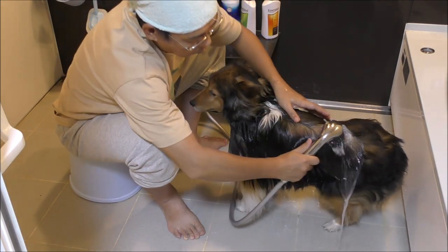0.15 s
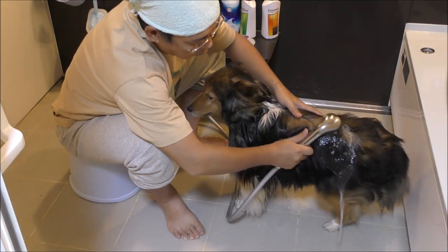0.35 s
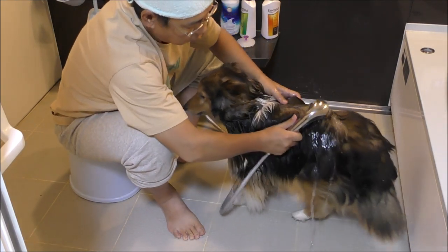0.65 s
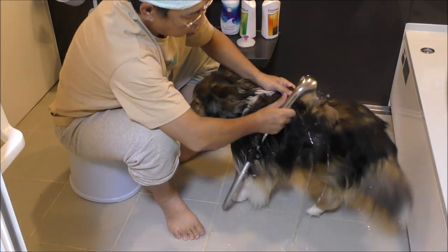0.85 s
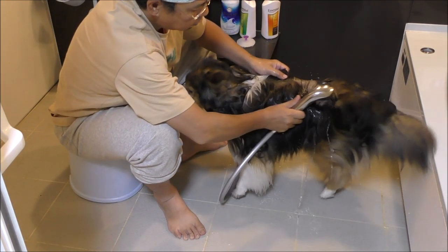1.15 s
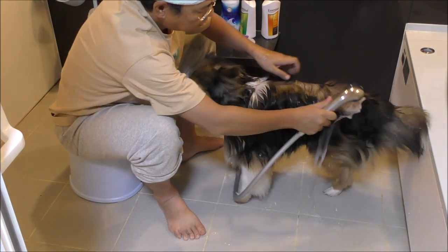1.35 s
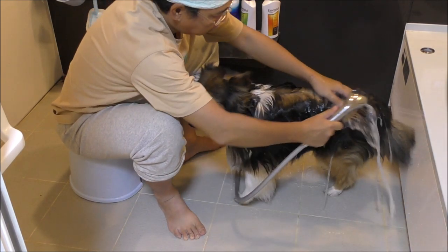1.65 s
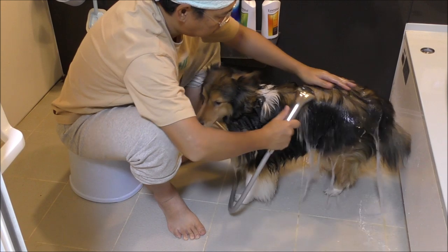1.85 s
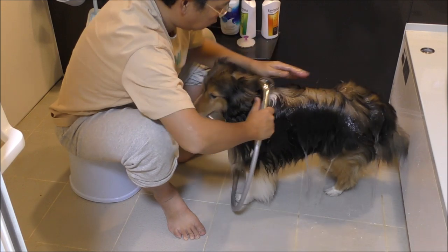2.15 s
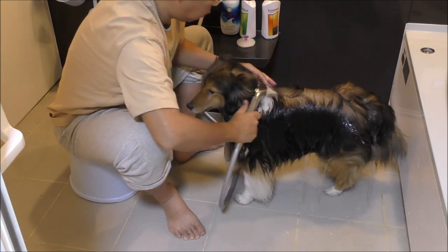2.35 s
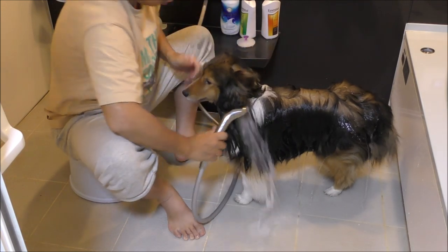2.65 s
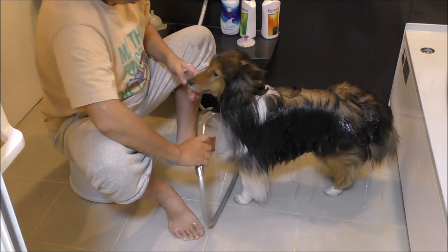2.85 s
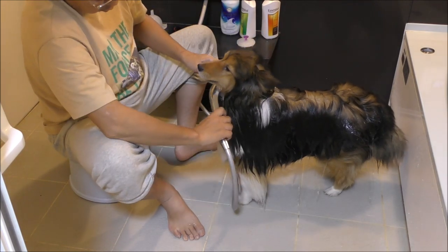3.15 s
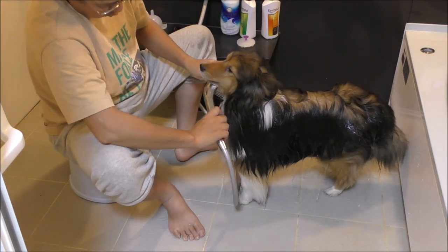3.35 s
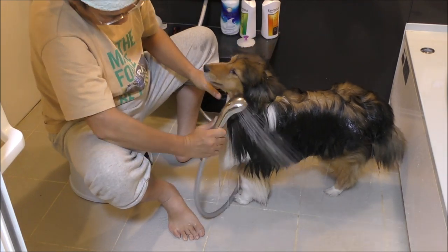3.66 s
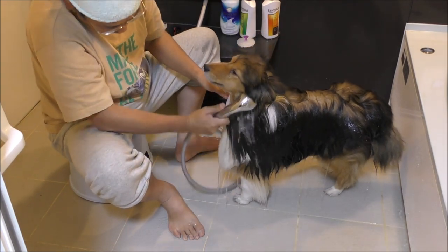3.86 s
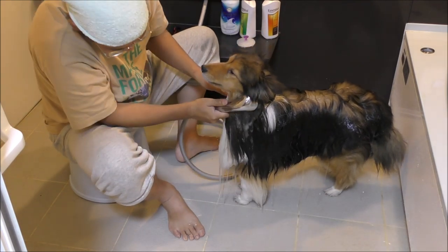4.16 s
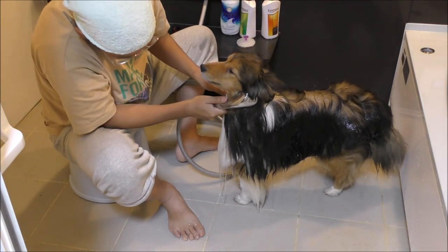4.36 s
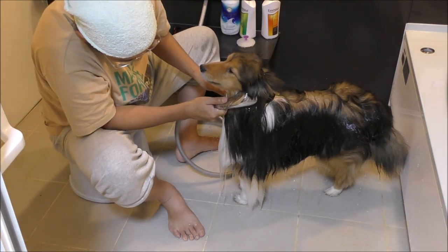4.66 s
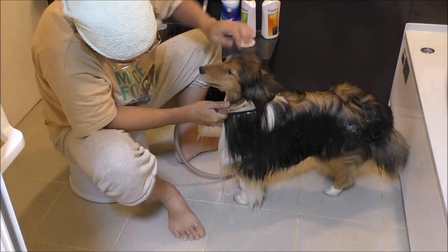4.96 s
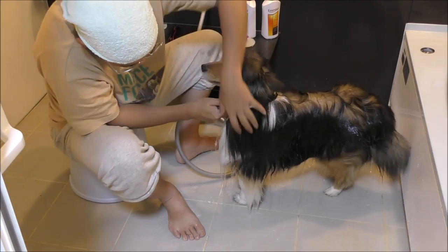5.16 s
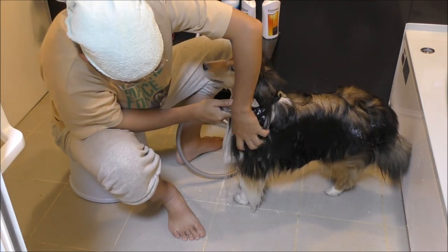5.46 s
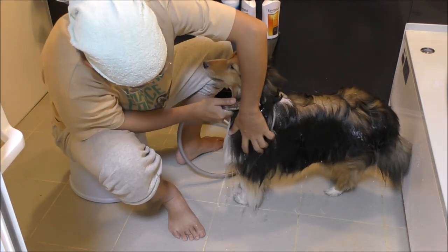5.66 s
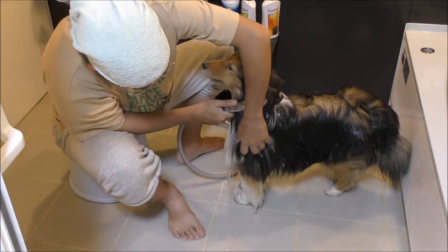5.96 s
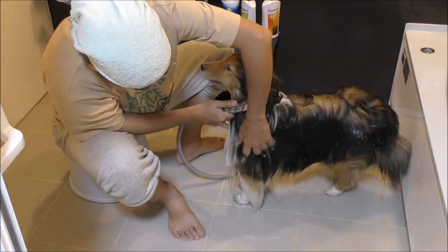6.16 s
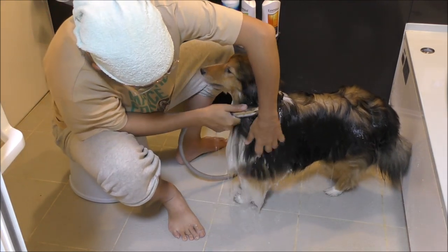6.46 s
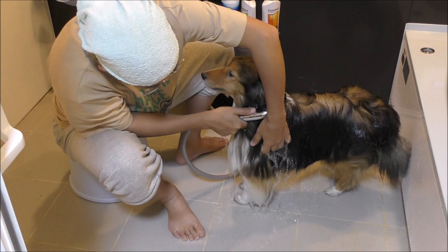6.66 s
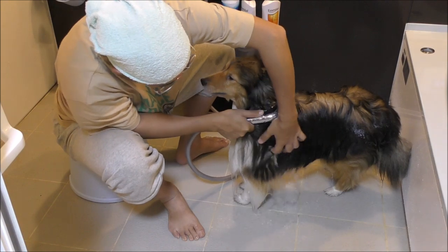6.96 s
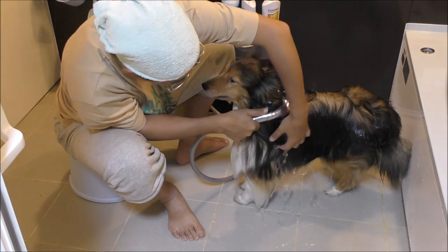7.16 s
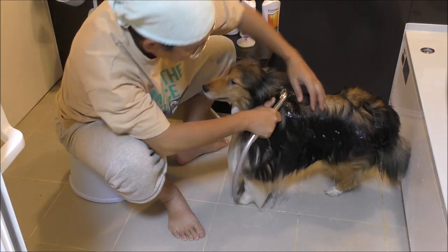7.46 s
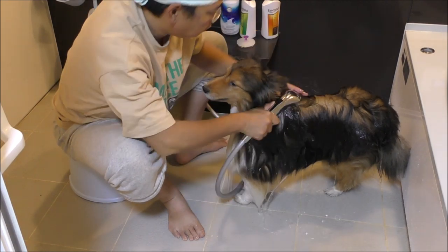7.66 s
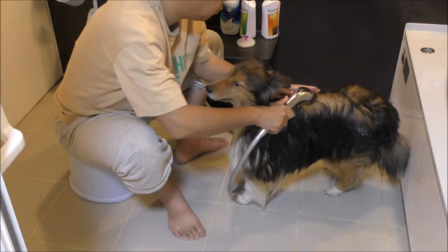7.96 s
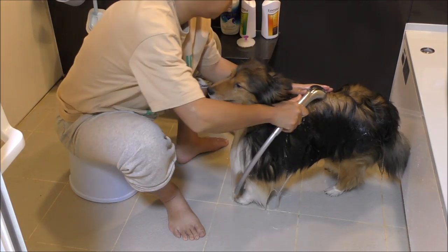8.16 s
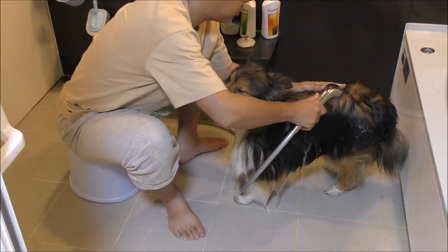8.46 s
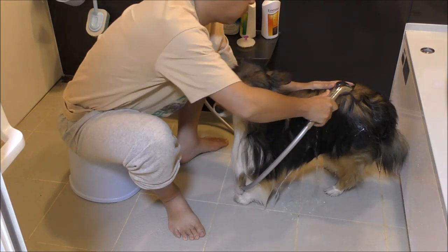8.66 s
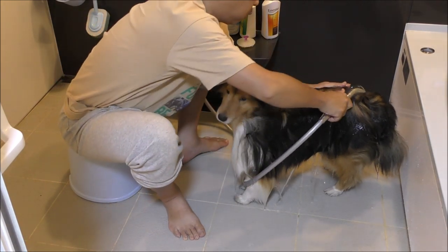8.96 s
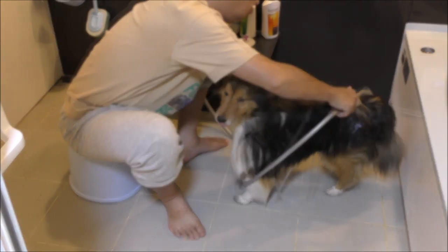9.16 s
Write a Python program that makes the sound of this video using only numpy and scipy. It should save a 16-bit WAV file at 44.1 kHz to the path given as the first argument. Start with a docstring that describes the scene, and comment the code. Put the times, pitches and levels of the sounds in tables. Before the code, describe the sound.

A hand shower sprays soaked fur with uneven sizzling, is pressed in quietly with spitting leaks, and briefly bursts back before fading to splutters.

```python
"""Hand-shower jets rinse a dog in a small tiled bathroom, hissing through the air and churning in its wet coat.
After four seconds the head is pressed into the fur, fizzing and letting out squirts; it is briefly lifted again.
Hiss, sizzle, drips and run-off are coloured showers of random impacts; churning is a bank of ringing bubbles;
squirts are decaying, pitched bursts of droplets. Run-off patters on the tiles, over a low, droning room noise.
"""
import sys
import numpy as np
from scipy import signal
from scipy.fft import rfft, irfft
from scipy.io import wavfile

SR = 44100
rng = np.random.default_rng(int(sys.argv[2]) if len(sys.argv) > 2 else 0)


def generate_wav(sig):
    """Save sig (samples, or channels by samples) to the path in sys.argv[1] as 16-bit PCM at SR."""
    pcm = np.round(np.clip(np.atleast_2d(sig).T, -1, 1) * 32767).astype(np.int16)
    wavfile.write(sys.argv[1], SR, pcm)


N = 411003
T = np.arange(N) / SR   # time of every sample (s)

# Source levels below are set ahead of the room's reflections and balance.
# how freely the jets play on the coat: start_s, level_db
JET_PLAY = [(0.0, -28), (0.21, -30.5), (0.28, -43.5), (0.36, -48), (0.46, -33.5), (0.9, -29.5),
            (1.42, -28.5), (2.1, -30.5), (2.6, -33.5), (3.0, -33.5), (3.98, -32.5), (4.03, -42),
            (4.25, -57.5), (6.65, -54.5), (7.2, -44.5), (7.35, -30.5), (7.5, -37.5), (7.61, -46.5),
            (8.4, -52), (9.05, -48.5), (9.32, -41)]
# water standing in the coat under the jets: start_s, churn level_db at reference play, bubble pitch_hz
COAT_POOL = [(0.0, -25, 2780), (0.5, -30, 2900), (0.78, -27, 2670), (1.03, -32, 2250), (1.39, -26, 2510),
             (1.7, -25, 1650), (1.97, -31.5, 2400), (2.07, -25.5, 2680), (2.2, -30.5, 2120),
             (2.38, -25, 2540), (2.78, -30.5, 2720), (2.95, -34, 2260), (3.12, -27.5, 3200),
             (3.47, -26, 2110), (3.65, -34, 2520), (4.3, -25, 1600), (6.6, -24.5, 1620), (7.3, -33.5, 3340),
             (7.45, -26.5, 2550), (9.32, -36.5, 1490)]
# jets swing square onto the ribs: centre_s, half_length_s, drumming level_db, spray level_db
RIB_SWEEPS = [(0.88, 0.092, -49, -31.5), (1.078, 0.053, -46.5, -23), (2.054, 0.03, -54, -26),
              (2.805, 0.042, -47.5, -21), (3.726, 0.038, -39, -25.5), (3.973, 0.029, -64, -27)]
# louder escapes of water under the rim of the head:
# start_s, level_db before the pressure front, pitch_hz, spread_octaves, fade_s
RIM_SQUIRTS = [(4.226, -34.5, 5200, 0.26, 0.024), (4.342, -36.5, 4300, 0.35, 0.042),
               (4.508, -41, 11800, 0.3, 0.024), (4.574, -41, 7600, 0.14, 0.033),
               (4.671, -34.5, 5360, 0.34, 0.058), (4.8, -40, 4060, 0.12, 0.036),
               (4.815, -43.5, 9500, 0.12, 0.11), (5.139, -37, 6640, 0.11, 0.016),
               (5.225, -43, 11670, 0.24, 0.027), (5.27, -42.5, 2230, 0.11, 0.065),
               (5.65, -43, 2620, 0.048, 0.034), (5.34, -37, 8520, 0.38, 0.044),
               (5.386, -37.0, 6400, 0.14, 0.044), (5.667, -42.5, 6800, 0.28, 0.3),
               (5.784, -38, 4280, 0.09, 0.031), (5.9, -40, 4410, 0.15, 0.037),
               (5.965, -42.5, 2460, 0.08, 0.032), (6.016, -43.5, 3480, 0.068, 0.034),
               (6.066, -29, 2740, 0.41, 0.036), (6.118, -36, 7500, 0.44, 0.029),
               (6.274, -42, 3620, 0.14, 0.066), (6.43, -39, 5600, 0.64, 0.08),
               (6.673, -38.5, 1930, 0.35, 0.027), (6.71, -35.5, 6500, 0.6, 0.069),
               (6.867, -33, 6100, 0.61, 0.2), (7.487, -22.5, 3880, 0.44, 0.033),
               (7.675, -25, 4270, 0.79, 0.14), (7.68, -24.5, 1710, 0.24, 0.02),
               (7.854, -30.5, 3630, 0.39, 0.11), (7.928, -37.5, 2000, 0.26, 0.034),
               (8.06, -33, 4050, 0.56, 0.045), (8.21, -35.0, 9300, 0.3, 0.026),
               (8.253, -29.5, 3640, 0.5, 0.027), (8.429, -39, 2800, 0.31, 0.057),
               (8.503, -33, 6260, 0.19, 0.023), (8.537, -31.5, 5470, 0.6, 0.073),
               (8.643, -35, 8850, 0.32, 0.036), (8.718, -43, 2400, 0.07, 0.033),
               (8.724, -38.5, 6850, 0.24, 0.069), (8.852, -38, 7010, 0.12, 0.026),
               (8.975, -32, 9500, 0.54, 0.021), (9.082, -30.5, 10400, 0.5, 0.24),
               (9.231, -31, 5400, 0.13, 0.032)]
# run-off pouring from the coat onto the tiles: centre_s, level_db, half_length_s
RUNOFF_POURS = [(.06, -43, 0.07), (.52, -45.5, 0.035), (.75, -50, 0.065), (1.9, -43, 0.08),
                (2.98, -41, 0.069), (3.72, -44, 0.071), (6.95, -49, 0.04), (7.42, -44.5, 0.13)]

# colour of the mist hissing through the air: frequency_hz, density_db_per_hz
MIST_COLOUR = [(1000, -10), (2500, -29), (5000, -10.5), (8000, -3.5), (9500, -1), (12500, -2.5),
               (15000, -5), (16000, -11.5)]
# colour of drops sizzling on fur: frequency_hz, density_db_per_hz
SIZZLE_COLOUR = [(850, -10), (1200, -1.5), (2000, -11), (3000, -2), (4500, 0.5), (6500, -1), (8200, -7),
                 (10000, -4), (15000, -16.5)]
# colour of spray thrown off the ribs: frequency_hz, density_db_per_hz
SPLASH_COLOUR = [(1900, -7), (3200, 1), (6000, -1.5), (10000, -0.5), (15000, -6)]
# colour of the jets drumming on the body: frequency_hz, density_db_per_hz
BODY_COLOUR = [(50, -20), (100, -17), (165, -6), (300, -5.5), (450, -13), (800, -38)]
# colour of run-off on the tiles: frequency_hz, density_db_per_hz
TILE_COLOUR = [(150, -13.5), (300, -6.5), (550, -7.5), (720, 1.5), (900, -12), (1100, 4), (1500, -13.5)]
# colour of the room's low rush: frequency_hz, density_db_per_hz
ROOM_COLOUR = [(15, -49), (25, -9), (43, -11.5), (60, -8), (114, -8.5), (200, -2), (225, -4.5), (289, -0.5),
               (395, -1.5), (425, -5.5), (507, -2), (554, -8.5), (850, -13), (1100, -45), (1870, -120)]
# low droning resonances of the room: pitch_hz, width_hz, level_db
ROOM_DRONES = [(117.2, 11, -64.5), (159.2, 4, -67), (291.7, 6.5, -64)]
# stereo width of reflections and room noise: frequency_hz, side_gain_db
STEREO_WIDTH = [(60, -2.5), (150, -3.5), (400, -9), (2500, -10), (4500, -7.5), (8000, -28.5), (16000, -78)]

REFERENCE_JETS_DB = -30   # the jets playing openly, a hand's width from the coat
MIST_DB, SIZZLE_DB = -30, -30.5   # levels at reference play
# dB of change for each dB of the jets; pressing the head in muffles the drops on fur least
MIST_FOLLOWS, SIZZLE_FOLLOWS, CHURN_FOLLOWS = 0.89, 0.68, 0.96
PRESSED_FROM_S = 4.2   # the head is pushed into the fur; small leaks run from here to the end
SPLUTTER_DB, SPLUTTER_RANGE_DB = -43, 1.5   # weakest broad spurt, and how much louder one can be
DRIP_DB = -56.5   # the wet coat drips whatever the jets do
ROOM_RUSH_DB = -55
ROOM_T60_S = 0.32   # reverberation time over nearly the whole range
LEAN_DB = -23.5   # side against mid: the dog stands a little to the right
CUTOFF_HZ = 15850


def water_levels():
    """Mist, sizzle and churn levels (dB) follow the play of the jets; bubble pitch (Hz) follows the pool."""
    play_db = in_time(JET_PLAY)[0] - REFERENCE_JETS_DB
    pool_db, churn_hz = in_time(COAT_POOL)
    mist_db = MIST_DB + MIST_FOLLOWS * play_db
    sizzle_db = SIZZLE_DB + SIZZLE_FOLLOWS * play_db
    churn_db = pool_db + CHURN_FOLLOWS * play_db
    return mist_db, sizzle_db, churn_db, churn_hz


def wobble(per_s, depth_db):
    """The hand and the dog never keep quite still: a random wander in dB."""
    return depth_db * drift(per_s)


def spray(level_db, spectrum, per_s, spread_db, flutter_db):
    """A shower of tiny impacts whose strength flutters at a slow and a fast pace, then takes on a colour."""
    flutter = flutter_db * (drift(per_s=35) + drift(per_s=300))
    shower = drops(per_s, spread_db) * from_db(flutter)
    return from_db(level_db) * rms_one(coloured(shower, spectrum))


def churn(level_db, pitch_hz, spread_oct, per_s, size_db, sharpness, patchy_db, count=18):
    """Jets beat air into soaked fur; bubbles ring around a pitch that follows the depth of the water."""
    out, power = 0, 0
    for hz in np.geomspace(1120, 4400, count):
        octaves_off = np.log2(hz / pitch_hz)
        share = np.exp(-(octaves_off / spread_oct) ** 2 / 2)
        bubbles = resonance(drops(per_s, size_db), hz, hz / sharpness)
        patches = from_db(patchy_db * drift(per_s=25))
        out = out + np.sqrt(share) * patches * bubbles
        power = power + share
    low_cut = signal.butter(4, 1000, "high", fs=SR, output="sos")
    return from_db(level_db) * signal.sosfilt(low_cut, out / np.sqrt(power))


def splashes():
    """Each swing onto the ribs throws up a bright surge of spray."""
    surges = swells([(s, db, half) for s, half, _, db in RIB_SWEEPS])
    return surges * rms_one(coloured(drops(per_s=8000, spread_db=2.5), SPLASH_COLOUR))


def drumming():
    """A dull rumble of impacts while the jets hit the ribs square on."""
    surges = swells([(s, db, half) for s, half, db, _ in RIB_SWEEPS])
    return surges * rms_one(coloured(drops(per_s=1500, spread_db=7.5), BODY_COLOUR))


def squirts(rows, slit_opening_s, front_db, front_s, per_s, size_db, ragged_db):
    """A gap opens under the rim: a sudden burst of droplets, coloured by the pocket of water behind it."""
    out = np.zeros(N)
    grains = drops(per_s, size_db) * from_db(ragged_db * drift(per_s=160))
    steps = np.linspace(-4, 4, 17)   # in spreads either side of the pitch
    bell_db = -np.abs(steps) ** 3   # flat-topped and steep-sided
    for s, db, hz, spread, fade in rows:
        start = int(s * SR)
        t = T[:min(int(7 * fade * SR), N - start)]
        span = slice(start, start + len(t))
        pocket = np.c_[hz * 2 ** (steps * spread), bell_db]
        attack_s = slit_opening_s * np.exp(-spread / 0.053)   # broader squirts open faster
        front = from_db(front_db * np.exp(-t / front_s))   # the pent-up pressure goes first
        shape = (1 - np.exp(-t / attack_s)) * np.exp(-t / fade) * front
        out[span] += from_db(db) * shape * rms_one(coloured(grains[span], pocket))
    return out


def splutter(pitch_hz, spread_oct, fade_s, count=30):
    """Rows of soft, broad spurts: pressure under the buried head lets go several times a second."""
    when, size, pitch, length = rng.random((count, 4)).T
    level_db = SPLUTTER_DB + SPLUTTER_RANGE_DB * size
    hz = pitch_hz * 2 ** (pitch - .5)
    return np.c_[pressed_times(when), level_db, hz, np.full(count, spread_oct), fade_s * (.5 + length)]


def seepage(level_db, range_db, low_hz, high_hz, spread_oct, fade_s, count=100):
    """Rows of tiny squirts at chance pitches with the head in the fur; higher ones tend to be broader."""
    when, size, pitch, width, length = rng.random((count, 5)).T
    row_db = level_db + range_db * size ** 2
    hz = low_hz * (high_hz / low_hz) ** pitch
    spread = spread_oct * (.5 + width) * (.5 + pitch)
    return np.c_[pressed_times(when), row_db, hz, spread, fade_s * (.5 + length)]


def pressed_times(chance):
    """Unevenly paced moments from when the head is pressed in until just before the end."""
    count = len(chance)
    length_s = T[-1] - PRESSED_FROM_S - .05
    return PRESSED_FROM_S + (np.arange(count) + chance) / count * length_s


def drips(level_db, per_s, size_db, sharpness, count=8):
    """Stray larger drops: sharp ticks from a bank of short resonances, each with its own pitch."""
    pitches_hz = np.geomspace(2200, 12500, count)
    ticks = sum(resonance(drops(per_s, size_db), hz, hz / sharpness) for hz in pitches_hz)
    return from_db(level_db) * rms_one(ticks)


def bathroom(x, direct_db, wet_db, count=5):
    """Mid and side: drops land at ever different places, each with reflections of its own."""
    places = np.array([drift(per_s=110) for _ in range(count)])
    places /= np.sqrt(np.sum(places ** 2, axis=0))   # constant total power

    def reflections():
        """Reflections of all the places, summed."""
        wet = sum(signal.oaconvolve(x * near, tail(top_t60_s=0.27, split_hz=20000))[:N]
                  for near in places)
        return from_db(wet_db) * wet

    mid, side = reflections(), reflections()
    return from_db(direct_db) * x + mid, side


def tail(top_t60_s, split_hz):
    """Dense reflections between tiles as decaying noise; unit energy."""
    length = SR * 3 // 4
    t, noise = T[:length], rng.standard_normal(length)
    main = signal.sosfilt(signal.butter(1, split_hz, fs=SR, output="sos"), noise)
    rest = noise - main
    response = main * from_db(-60 * t / ROOM_T60_S) + rest * from_db(-60 * t / top_t60_s)
    response = response * (t > .004)   # a short gap before the first reflection
    return response / np.sqrt(np.sum(response ** 2))


def near_echo(x, echo_db):
    """A small hard surface half a metre away throws the treble back."""
    lag = round(.00297 * SR)
    high_pass = signal.butter(2, 7000, "high", fs=SR, output="sos")
    return x + from_db(echo_db) * np.pad(signal.sosfilt(high_pass, x), (lag, 0))[:N]


def room_noise():
    """A steady low rush of coloured noise with a few droning resonances."""
    rush = from_db(ROOM_RUSH_DB) * rms_one(coloured(rng.standard_normal(N), ROOM_COLOUR))
    drones = sum(from_db(db) * resonance(rng.standard_normal(N), hz, width) for hz, width, db in ROOM_DRONES)
    return rush + drones


def drops(per_s, spread_db):
    """Impacts at random moments and of random sign, many small and a few large; unit power."""
    at = np.flatnonzero(rng.random(N) < per_s / SR)
    size = from_db(spread_db * np.minimum(rng.standard_normal(len(at)), 3))
    clicks = np.zeros(N)
    clicks[at] = size * rng.choice([-1, 1], len(at))
    return rms_one(clicks)


def resonance(x, hz, width_hz):
    """Two-pole resonance that keeps the power of white noise."""
    r = np.exp(-np.pi * width_hz / SR)
    feed = np.sqrt((1 - r * r) / 2) * np.array([1, 0, -1])
    ring = [1, -2 * r * np.cos(2 * np.pi * hz / SR), r * r]
    return signal.lfilter(feed, ring, x + 1e-18)


def coloured(x, spectrum, size=4096):
    """Causal (minimum-phase) filter with the given spectrum."""
    cepstrum = irfft(np.log(gain_at(spectrum, np.fft.rfftfreq(size, 1 / SR))))
    cepstrum[1:size // 2] *= 2   # fold the cepstrum into its causal half
    cepstrum[size // 2 + 1:] = 0
    return signal.oaconvolve(x, irfft(np.exp(rfft(cepstrum))))[:len(x)]


def gain_at(points, hz):
    """Gain of a spectrum, falling 20 dB per octave past its ends."""
    f, db = np.transpose(points)
    octave = np.log2(np.maximum(hz, 1))
    outside = np.abs(octave - np.clip(octave, np.log2(f[0]), np.log2(f[-1])))
    return from_db(np.interp(octave, np.log2(f), db) - 20 * outside)


def drift(per_s):
    """Random wander: straight lines between normal random values, per_s of them a second."""
    knots = rng.standard_normal(N // 100)
    return np.interp(T * per_s, np.arange(len(knots)), knots)


def swells(rows):
    """Gain of smooth bell-shaped rises and falls."""
    return sum(from_db(db) * np.exp(-((T - s) / half) ** 2 / 2) for s, db, half in rows)


def in_time(rows):
    """Each column of a curve at every sample."""
    s, *columns = np.transpose(rows)
    return [np.interp(T, s, c) for c in columns]


def together_db(*gains):
    """Level of unrelated sounds heard at once."""
    return 10 * np.log10(sum(gain ** 2 for gain in gains))


def from_db(db):
    """Decibels to gain."""
    return 10 ** (np.asarray(db) / 20)


def rms_one(x):
    """Scale to unit power."""
    return x / np.sqrt(np.mean(x ** 2) + 1e-20)


def scene():
    """All the water sounds in the room, slightly to the right, over the room noise."""
    mist_db, sizzle_db, churn_db, churn_hz = water_levels()
    mist_db = mist_db + wobble(per_s=11, depth_db=-0.1)
    water = spray(mist_db, MIST_COLOUR, per_s=5500, spread_db=4.0, flutter_db=1.76)
    fur_db = sizzle_db + wobble(per_s=8.2, depth_db=0.4)
    water += spray(fur_db, SIZZLE_COLOUR, per_s=7000, spread_db=3.0, flutter_db=2.2)
    water += churn(churn_db, churn_hz, spread_oct=0.5, per_s=140, size_db=4.0, sharpness=15.0, patchy_db=0.7)
    water += drumming() + splashes()

    tiny = seepage(level_db=-49.5, range_db=10.5, low_hz=1715, high_hz=10370, spread_oct=0.067, fade_s=0.013)
    broad = splutter(pitch_hz=8650, spread_oct=0.34, fade_s=0.044)
    leaks = np.vstack([RIM_SQUIRTS, tiny, broad])
    water += squirts(leaks, slit_opening_s=0.0035, front_db=4.0, front_s=0.0042,
                     per_s=6500, size_db=3.5, ragged_db=2.5)

    runoff_db = together_db(swells(RUNOFF_POURS), from_db(churn_db - 23.0))   # a soaked coat always sheds water
    water += spray(runoff_db, TILE_COLOUR, per_s=1400, spread_db=4.5, flutter_db=0.2)
    drip_db = together_db(from_db(sizzle_db - 16.5), from_db(DRIP_DB))
    water += drips(drip_db, per_s=4, size_db=4.5, sharpness=2.0)

    mid, side = bathroom(water, direct_db=-3.5, wet_db=-2.5)
    mid = near_echo(mid, echo_db=-11.5) + room_noise()
    lean = signal.sosfilt(signal.butter(1, 2500, fs=SR, output="sos"), mid)   # the treble stays in the centre
    side = coloured(side + from_db(-4.0) * room_noise(), STEREO_WIDTH) - from_db(LEAN_DB) * lean
    return np.array([mid + side, mid - side])


def record(dry):
    """Cut the top steeply with an elliptic low-pass."""
    return signal.sosfilt(signal.ellip(12, .1, 80, CUTOFF_HZ, fs=SR, output="sos"), dry)


dry = scene()
out = record(dry)
generate_wav(out)
```